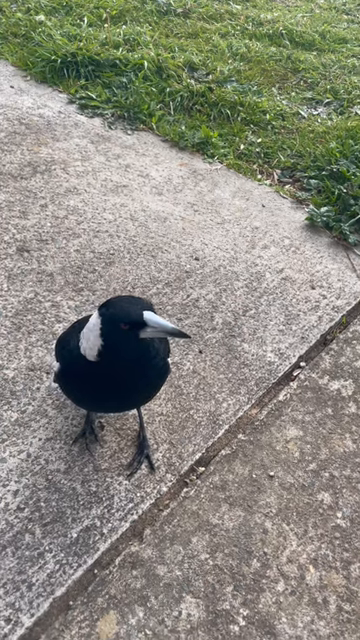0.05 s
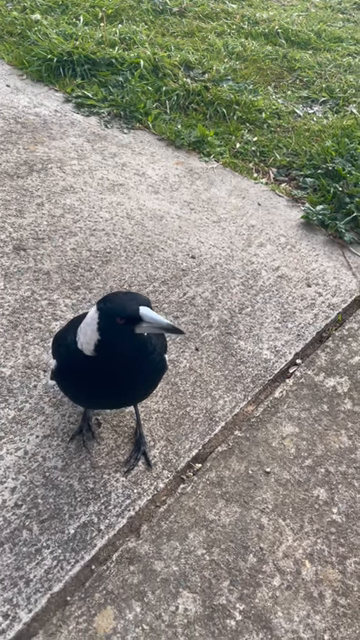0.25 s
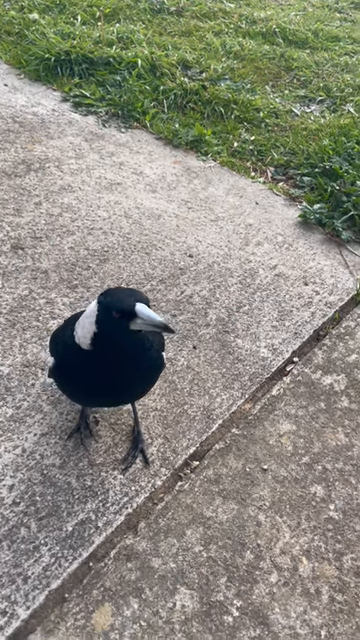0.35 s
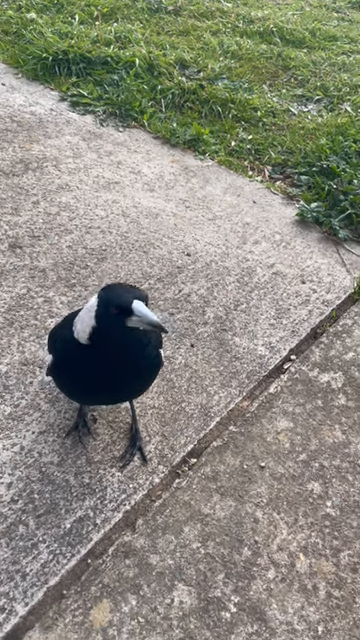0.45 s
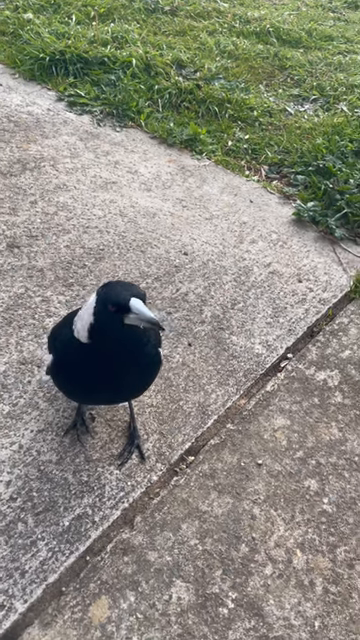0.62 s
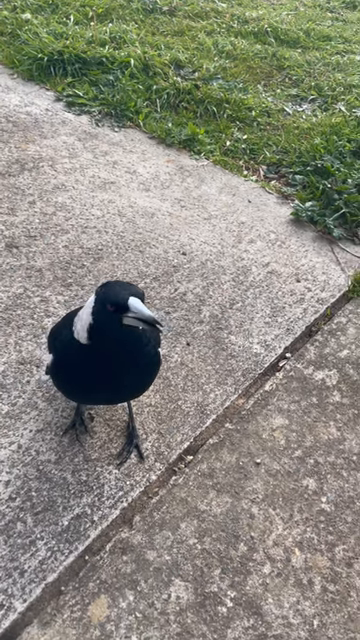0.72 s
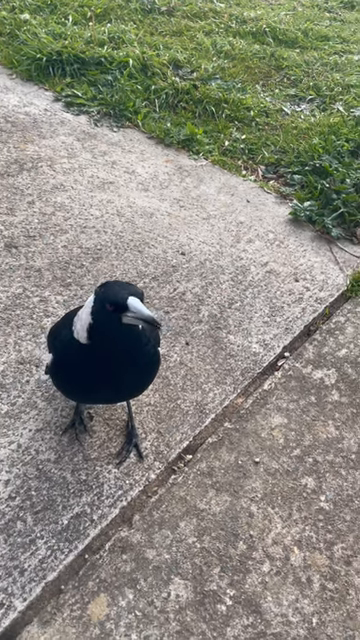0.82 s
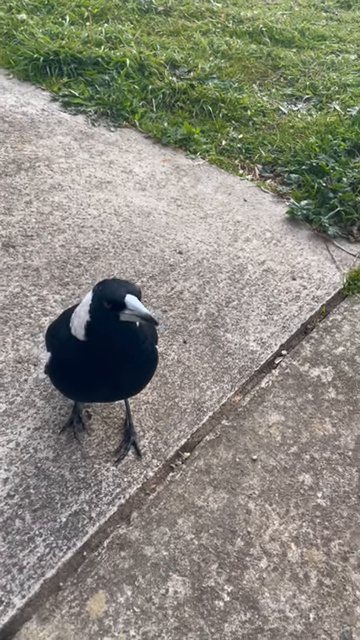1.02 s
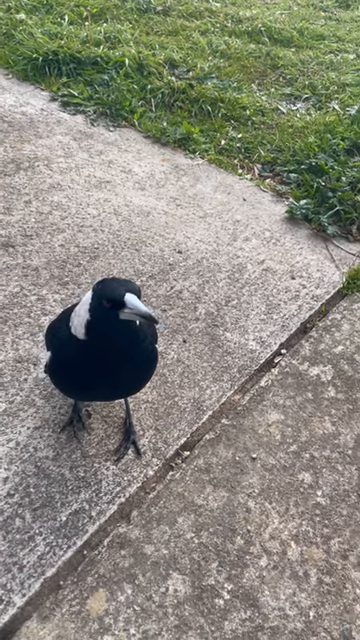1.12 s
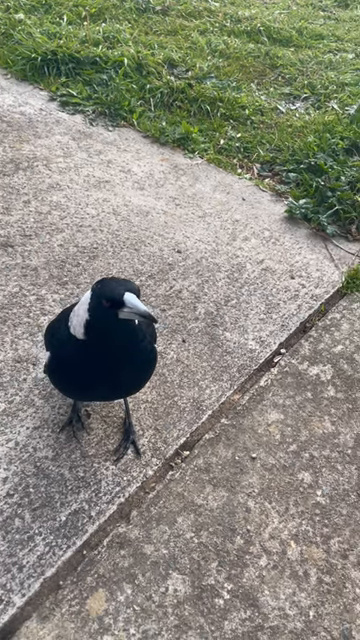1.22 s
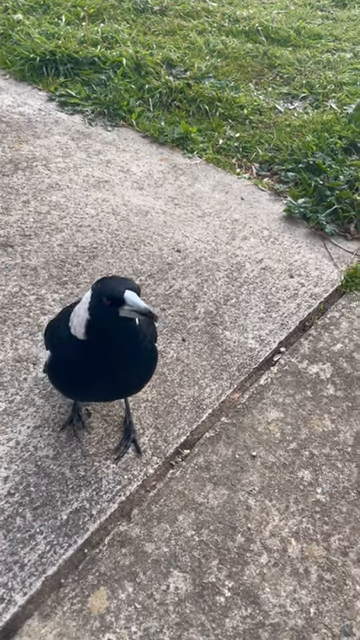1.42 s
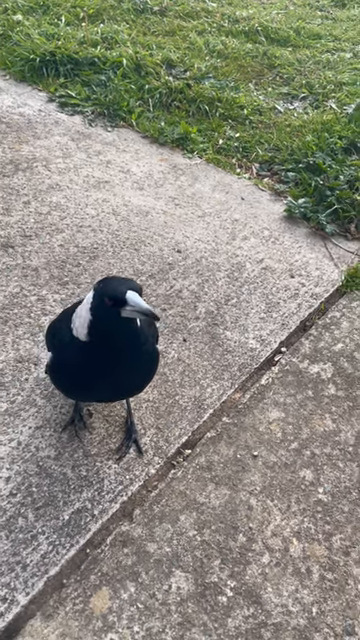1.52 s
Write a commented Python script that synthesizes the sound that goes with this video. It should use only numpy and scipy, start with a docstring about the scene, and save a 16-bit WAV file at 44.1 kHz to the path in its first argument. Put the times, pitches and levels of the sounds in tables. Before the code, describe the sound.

A magpie warbles one short phrase up close, over a low outdoor rumble.

```python
"""On a concrete garden path, a magpie warbles one phrase close to a stereo microphone.
The two sides of its syrinx sing held notes, quick slides and a trill; where they overlap they
beat and rasp. The garden returns a faint echo. Behind the bird lie a low outdoor rumble, a faint
hum and the thin whistles of far birds, and a few soft bumps land on the microphone."""
import sys
import numpy as np
from scipy import signal
from scipy.fft import rfft, irfft
from scipy.io import wavfile

SR = 44100
rng = np.random.default_rng(int(sys.argv[2]) if len(sys.argv) > 2 else 0)


def to_wav(s):
    """Save 16-bit WAV."""
    ch = np.atleast_2d(s).T  # columns
    pcm = np.round(np.clip(ch, -1, 1) * 32767)  # PCM
    wavfile.write(sys.argv[1], SR, pcm.astype(np.int16))


N = 68355
TIME, FREQS = np.arange(N) / SR, np.fft.rfftfreq(N, 1 / SR)

# spectrum of the outdoor ambience: (frequency [Hz], relative density [dB])
AMBIENCE_SPECTRUM = [(18, -51.5), (27, -22), (40, -1.5), (65, 4.5), (95, 2), (150, -6), (200, -3),
                     (250, -11.5), (400, -18), (709, -22), (1200, -24.5), (2560, -40), (4000, -43.5),
                     (5000, -46.5), (7090, -67), (15000, -74.5)]
# how alike the ambience is in left and right: (frequency [Hz], correlation [0-1])
AMBIENCE_LIKENESS = [(60, 0.98), (180, 1), (550, 0.2), (1650, 0.84), (4970, 0.25), (15000, 0.55)]
# birds in the distance: (start [s], length [s], pitch [Hz], level before fading [dB])
FAR_WHISTLES = [(.02, 0.27, 4840, -67.5), (0.148, .16, 4040, -62), (0.83, 0.18, 5750, -53.5),
                (.92, .2, 4190, -64), (1.171, .25, 5770, -54.5), (1.24, 0.49, 4030, -71.5),
                (1.257, 0.33, 3505, -70.5)]
# soft bumps on the microphone: (start [s], pitch [Hz], level [dB], rise [s])
MIC_BUMPS = [(0.182, 66, -27.5, 0.013), (0.573, 95, -28, 0.0089), (0.611, 55, -29.5, 0.014),
             (0.922, 62, -22.5, 0.011), (1.026, 65, -29, 0.011)]
# the magpie's quick slides: (start [s], length [s], first pitch [Hz], middle pitch [Hz],
# last pitch [Hz], level [dB], overtones before the throat [dB])
SYRINX_SLIDES = [ (0.213, 0.0099, 840, 785, 828, -40, -12), (0.219, 0.01, 800, 903, 998, -24, -11.5),
                 (.231, .013, 1114, 863, 601, -21.5, -8.5), (.238, .014, 607, 618, 872, -26, -7.5),
                 (.240, 0.021, 1030, 1111, 1342, -31.5, -7), (.259, 0.0091, 896, 1069, 938, -23.5, -9),
                 (0.265, 0.0084, 1450, 1445, 1300, -28, 3), (.282, 0.013, 1709, 1391, 1454, -25.5, 8),
                 (0.355, 0.015, 950, 1007, 1084, -19, -11), (.365, 0.013, 1208, 1212, 1100, -26.5, 13),
                 (0.37, 0.014, 1100, 778, 756, -16, -13.5), (0.471, 0.022, 950, 765, 715, -34.5, -4.5),
                 (0.482, 0.017, 900, 966, 1064, -28, -2), (0.488, .014, 716, 708, 1099, -26, 4.5),
                 (0.491, 0.01, 1250, 1443, 1499, -28.5, 5), (0.526, .013, 1510, 1465, 1264, -20, 18.5),
                 (0.533, 0.0099, 1100, 1019, 860, -31.5, 3.5), (0.616, 0.0092, 1275, 1450, 1563, -27.5, 7),
                 (0.625, .019, 1644, 2405, 1620, -48.5, -20.5), (0.641, 0.011, 1664, 1266, 1170, -25.5, 2),
                 (0.769, .016, 1485, 1428, 1580, -21.5, -1.5), (.782, 0.0082, 1234, 1113, 1033, -18.5, 6),
                 (.790, .013, 1310, 1458, 1484, -17, 6), (0.869, .020, 775, 771, 772, -23, -14.5),
                 (0.89, 0.014, 855, 733, 880, -14.5, -12), (.906, .018, 972, 736, 756, -16.5, -16.5),
                 (0.926, 0.016, 742, 783, 780, -36, -17.5), (0.968, .014, 1615, 1555, 1508, -21, 9),
                 (1.137, .011, 723, 921, 1118, -20, -3.5), (1.15, 0.0098, 1000, 1043, 891, -17, -1.5),
                 (1.155, 0.0094, 830, 636.4, 479, -27.5, 17), (1.156, .014, 1370, 1082, 866, -24, -2.5),
                 (1.22, .022, 1385, 1410, 1350, -33.5, 7.5), (1.235, 0.0099, 919, 976, 980, -22.5, -5),
                 (1.241, .010, 1367, 1300, 1203, -25, 5), ]
# its held notes, one curve each: (time [s], pitch [Hz], level [dB])
HELD_NOTES = [
    [(.275, 1075, -21), (.281, 1104, -22.5), (.289, 1022, -22), (.295, 1100, -17.5), (.310, 1096, -15.5),
     (.321, 1110, -15.5), (.333, 1098, -16.5), (.340, 1100, -29.5)],
    [(.385, 875, -20.5), (.388, 870, -17), (.396, 899, -19.5), (.416, 896.2, -14.5), (.436, 891.5, -15.5),
     (.460, 883.5, -16), (.471, 930, -27)],
    [(0.499, 1108, -21.5), (0.507, 1190, -24), (0.519, 1189, -21.5), (0.527, 1207, -23.5)],
    [(0.539, 1308, -30.5), (0.561, 1299, -31), (0.609, 1290, -29), (0.623, 1333, -38)],
    [(0.649, 819, -27.5), (0.653, 792.2, -30.5), (0.757, 787.5, -28.5), (0.765, 823, -28)],
    [(.798, 1052, -16.5), (.804, 1099, -17), (.820, 1085, -10.5), (.830, 1076, -13.5), (.850, 1071, -16.5),
     (.867, 1045, -32)],
    [(.829, 875, -21), (.840, 821, -21), (.858, 804, -25.5), (.869, 773, -28.5)],
    [(.979, 1147, -26), (.990, 1198, -26.5), (1.012, 1233, -26.5), (1.050, 1233, -25), (1.095, 1224, -25.5),
     (1.115, 1216, -28.5), (1.134, 1223, -37.5)],
    [(1.249, 945, -18.5), (1.256, 951.6, -12), (1.265, 938, -12.5), (1.274, 951, -14), (1.283, 917, -27.5)],
]
# harmonics of each held note before the throat: (2nd [dB], 3rd [dB], 4th-6th [dB], higher [dB])
HELD_OVERTONES = [(-8, 11, -4.5, 5), (-7.5, -16, -10, 5), (3, 12, -4, 10.5), (12, 32, 14.5, 29),
                  (19.5, 14.5, 11.5, 5.5), (-3.5, 7.5, -1, -2.5), (0.5, -0.5, -1, -4.5), (6, 18.5, 0.5, 16),
                  (-23.5, -1, -7.5, -2.5)]
# throat and beak, filtering overtones and breath: (frequency [Hz], gain [dB])
THROAT_RESPONSE = [(300, -50.5), (800, -38), (1500, -8.5), (1800, -20), (2200, -26), (2700, -30),
                   (3300, -38), (3800, -30.5), (4150, -35), (4700, -36.5), (5600, -44.5), (6200, -48),
                   (7000, -50), (7600, -50.5), (8500, -52), (9500, -53), (11000, -58.5), (12500, -71),
                   (14000, -75.5), (15500, -61.5)]
# level between the microphone's ports: (frequency [Hz], left minus right [dB])
MIC_BALANCE = [(300, 1), (750, 3), (1200, 5.5), (2000, -1), (3300, -1.5), (5500, 0.5), (15000, -1.5)]
# phase between the ports: (frequency [Hz], lead of the left [rad])
MIC_PHASE = [(100, 0), (1290, -.1), (2580, .6), (3360, .8), (5080, .1), (6890, 2.8), (8790, 3.8),
             (10100, 5.8), (11900, 6.6), (13200, 9), (15500, 10.3)]
# gritty bursts of air in the voice: (start [s], length [s], level relative to the voice [dB])
AIR_BURSTS = [(.487, 0.013, -37), (0.778, 0.035, -29.5), (0.808, 0.032, -37.5), (0.826, .028, -29.5),
              (0.887, .014, -34), (0.9, 0.019, -33.5), (1.238, .04, -48.5)]
# spectrum of those bursts: (frequency [Hz], relative gain [dB])
AIR_SPECTRUM = [(700, -25.5), (1500, 6), (3000, -4), (4500, 4), (5500, 3), (6400, -15.5), (7500, -15.5),
                (9000, -11), (10500, -8.5), (12500, -16), (14000, -18.5), (15500, -5)]

NOTE_SHAKE_RAD, SLIDE_SHAKE_RAD = .015, .1  # cycle-to-cycle shake of the phase driving the overtones


def amp(db):
    """Decibels to gain."""
    return 10 ** (np.asarray(db) / 20)


def unit(x):
    """Scales to rms 1."""
    return x / np.sqrt(np.mean(abs(x) ** 2) + 1e-20)


def per_bin(points):
    """Interpolates a table over log frequency at every bin."""
    hz, value = np.transpose(points)
    return np.interp(np.log(FREQS + 1), np.log(hz + 1), value)


def shaped(x, gain):
    """Filters by a gain for every bin."""
    return irfft(rfft(x) * gain, N)


def wander(rate_hz):
    """Smooth random drift of rms 1."""
    return unit(shaped(rng.standard_normal(N), 1 / (1 + (FREQS / rate_hz) ** 4)))


def progress(start, length):
    """Runs from 0 to 1 during an event."""
    return np.clip((TIME - start) / length, 0, 1)


def swell(u):
    """A rounded rise and fall as u runs from 0 to 1."""
    return np.maximum(4 * u * (1 - u), 0) ** .93


def ambience(db=-44.5, hiss_from_hz=970, hiss_db_per_s=4):
    """The outdoor bed: a steady low rumble under a slowly growing hiss."""
    left, independent = rng.standard_normal((2, N))
    likeness = per_bin(AMBIENCE_LIKENESS)
    right = shaped(left, likeness) + shaped(independent, np.sqrt(1 - likeness ** 2))
    noise = unit(shaped(np.array([left, right]), amp(per_bin(AMBIENCE_SPECTRUM))))
    rumble = shaped(noise, 1 / (1 + (FREQS / hiss_from_hz) ** 4))
    hiss = (noise - rumble) * amp(hiss_db_per_s * (TIME - TIME.mean()))
    return amp(db) * (rumble + hiss)


def hum(hz=303.2, db=-59.5, end_s=.93):
    """A faint, wavering tone in the background that dies away."""
    tone = np.sin(2 * np.pi * hz * TIME) * (1 + .4 * wander(4.6))
    return amp(db) * unit(tone) * (1 - progress(end_s, .05))


def far_whistle(start, length, hz, db, rise_s=.055, fade_db=-19, waver_rad=.45):
    """A far bird's pure note, drawn out by distance; its phase wavers apart in left and right."""
    u = progress(start, length)
    envelope = progress(start, rise_s) ** 2 * amp(db + fade_db * u ** 2) * np.sqrt(1 - u)
    waver = waver_rad * np.array([wander(rate_hz=23) for _ in range(2)])
    return envelope * np.sin(2 * np.pi * hz * TIME + waver)


def mic_bump(start, hz, db, rise):
    """A dull push of a few cycles on the microphone."""
    t = np.maximum(TIME - start, 0)
    return amp(db) * (t / rise * np.exp(1 - t / rise)) ** 2 * np.sin(2 * np.pi * hz * t)


def slide(start, length, first_hz, middle_hz, last_hz, db, overtones_db):
    """A squeak bending through three pitches, as a gesture: pitch, strength, overtones, shake."""
    u = progress(start, length)
    bend = np.polyfit([0, .5, 1], [first_hz, middle_hz, last_hz], 2)
    return np.polyval(bend, u), amp(db) * swell(u), [overtones_db], SLIDE_SHAKE_RAD


def syrinx(gestures, jitter=.0018, brighten_db_per_db=.85, breath_per_rad=amp(9.5)):
    """The magpie's two voices add up; overtones grow from their joint motion, so overlaps rasp."""
    motion, power = np.zeros(N, complex), np.full(N, 1e-12)
    colour, shake = np.zeros((4, N)), np.zeros(N)
    unsteady = 1 + jitter * wander(rate_hz=120)
    for hz, strength, overtones_db, shake_rad in gestures:
        on = strength > 0
        level = strength[on]
        motion[on] += level * np.exp(2j * np.pi * np.cumsum((hz * unsteady)[on]) / SR)
        brightness = (level / level.max()) ** brighten_db_per_db
        colour[:, on] += amp(overtones_db)[:, None] * brightness * level ** 2
        shake[on] += shake_rad * level ** 2
        power[on] += level ** 2
    colour, shake = colour / power, shake / power  # the louder voice sets the timbre
    phase = np.angle(motion) + shake * wander(rate_hz=400)
    colour_row = {2: 0, 3: 1, 4: 2, 5: 2, 6: 2}  # higher harmonics share the last row
    overtones = sum(colour[colour_row.get(k, -1)] * np.cos(k * phase) for k in range(2, 18))
    breath = breath_per_rad * shake * rng.standard_normal(N)
    through_throat = shaped(abs(motion) * (overtones + breath), amp(per_bin(THROAT_RESPONSE)))
    return np.sqrt(2) * (motion.real + through_throat)


def close_mic(bird):
    """The microphone's two ports hear the near bird with different level and phase."""
    lean = amp(per_bin(MIC_BALANCE) / 2) * np.exp(.5j * per_bin(MIC_PHASE))
    return np.array([shaped(bird, lean), shaped(bird, 1 / lean)])


def garden_echo(bird, db=-23, t60_s=.2):
    """Faint scattered echoes from the garden, arriving just behind the direct sound."""
    tails = rng.standard_normal((2, N)) * amp(-60 * TIME / t60_s) * progress(.0058, .01)
    tails /= np.linalg.norm(tails[0])
    return amp(db) * signal.fftconvolve(bird[None], tails, axes=1)[:, :N]


def held_note(curve, overtones_db, edge_s=.003):
    """A gesture of the syrinx that holds a nearly steady pitch, with soft ends."""
    times, hz, db = np.transpose(curve)
    gate = progress(times[0] - edge_s, 2 * edge_s) * (1 - progress(times[-1] - edge_s, 2 * edge_s))
    strength = amp(np.interp(TIME, times, db)) * np.sin(gate * np.pi / 2) ** 2
    return np.interp(TIME, times, hz), strength, overtones_db, NOTE_SHAKE_RAD


def rasp(voice):
    """Turbulent air, let through in puffs on each cycle of the voice."""
    strength = sum(amp(db) * swell(progress(start, length)) for start, length, db in AIR_BURSTS)
    puffs = 2 * np.maximum(voice, 0) * strength * rng.standard_normal(N)
    return shaped(puffs, unit(amp(per_bin(AIR_SPECTRUM))))


def trill(start=1.168, length=.06, db=-22, overtones_db=-5, flutter_hz=100, swing_hz=70):
    """A rising, fluttering gesture: the note weakens each time its pitch flicks up."""
    u = progress(start, length)
    flutter = np.cos(2 * np.pi * flutter_hz * (TIME - start))
    hz = np.interp(u, [0, 1], [1077, 1180]) + swing_hz * flutter
    strength = amp(db) * np.sqrt(swell(u)) * (1 - .4 * (1 + flutter))
    return hz, strength, [overtones_db], SLIDE_SHAKE_RAD


def scene():
    """The magpie up close, the garden behind it and bumps on the microphone."""
    background = ambience() + hum() + sum(far_whistle(*row) for row in FAR_WHISTLES)
    bumps = sum(mic_bump(*row) for row in MIC_BUMPS)
    slides = [slide(*row) for row in SYRINX_SLIDES]
    notes = [held_note(*note) for note in zip(HELD_NOTES, HELD_OVERTONES)]
    voice = syrinx(slides + notes + [trill()])
    bird = voice + rasp(voice)
    return background + bumps + close_mic(bird) + garden_echo(bird)


def record(dry, fade_s=.004, cutoff_hz=15850):
    """Soft ends and the recorder's band limit."""
    ends = progress(0, fade_s) * (1 - progress(TIME[-1] - fade_s, fade_s))
    lowpass = signal.firwin(511, cutoff_hz, window=("kaiser", 9), fs=SR)
    return signal.oaconvolve(dry * np.sin(ends * np.pi / 2) ** 2, lowpass[None], "same")


dry = scene()
out = record(dry)
to_wav(out)
```